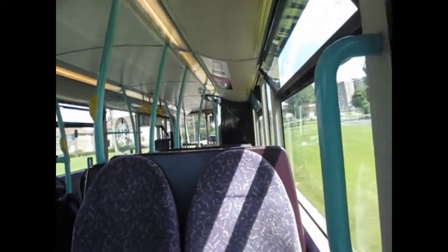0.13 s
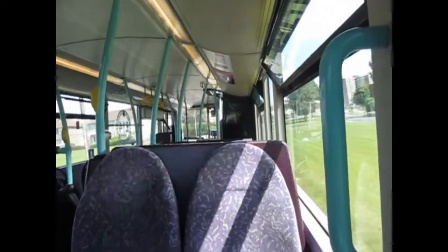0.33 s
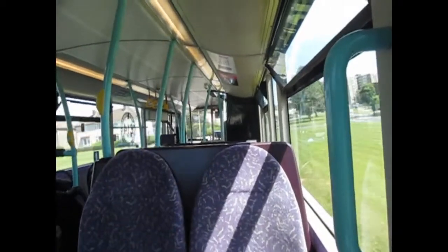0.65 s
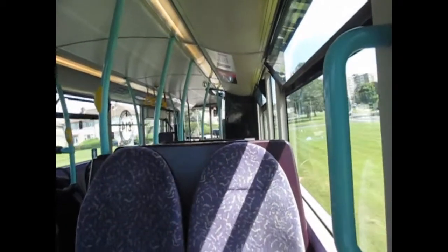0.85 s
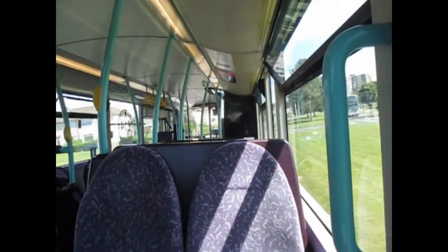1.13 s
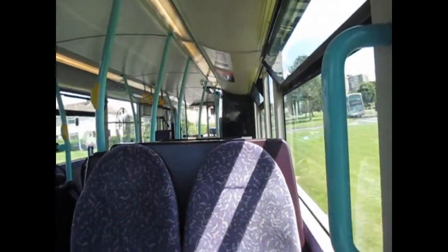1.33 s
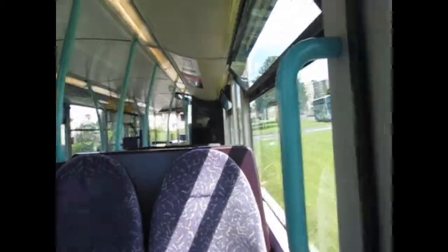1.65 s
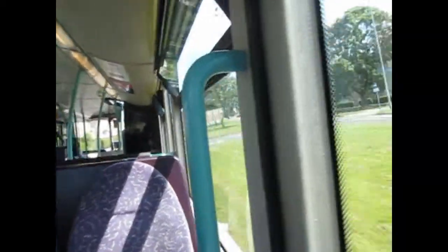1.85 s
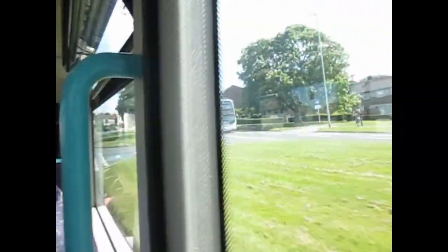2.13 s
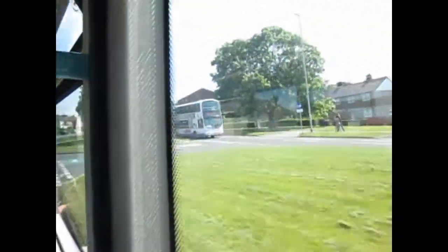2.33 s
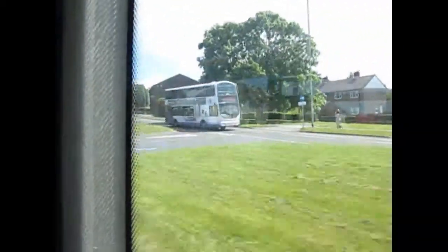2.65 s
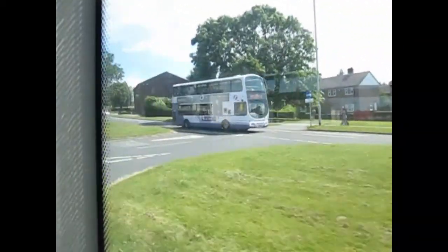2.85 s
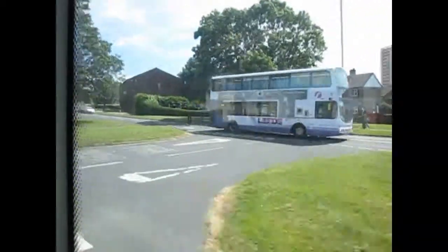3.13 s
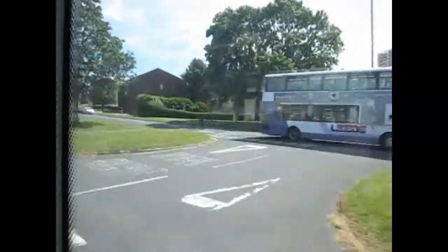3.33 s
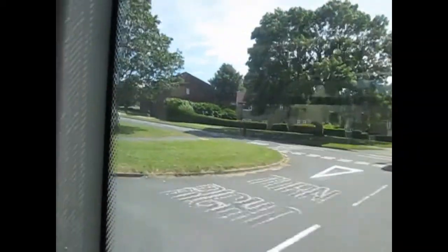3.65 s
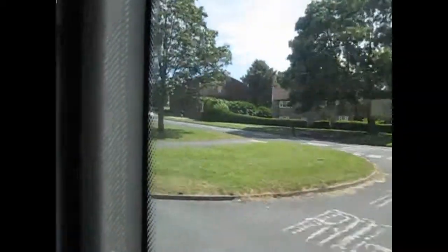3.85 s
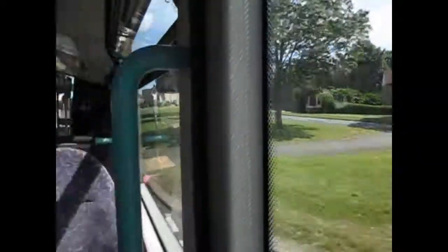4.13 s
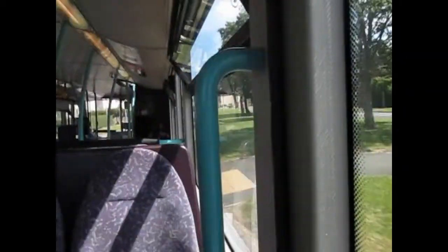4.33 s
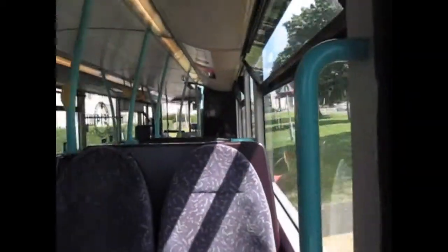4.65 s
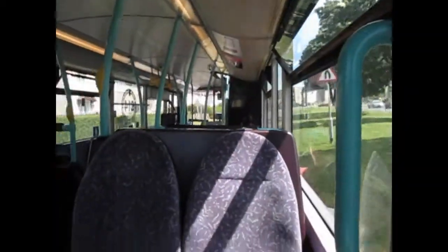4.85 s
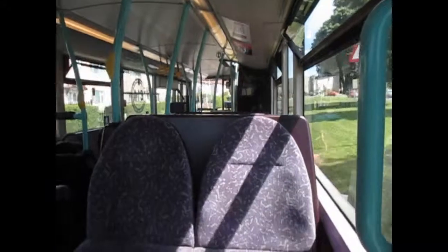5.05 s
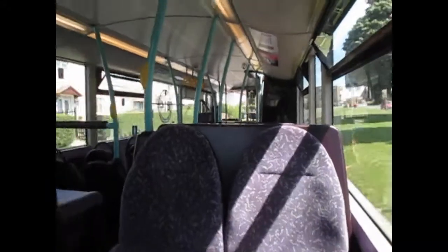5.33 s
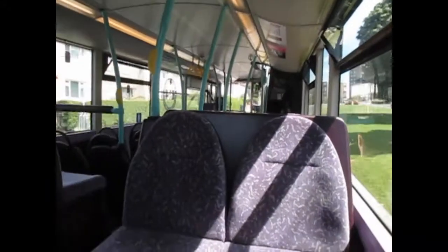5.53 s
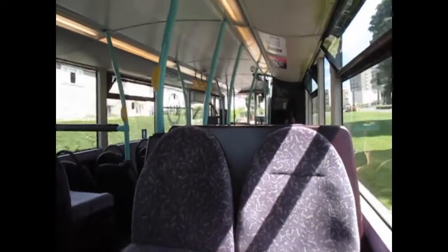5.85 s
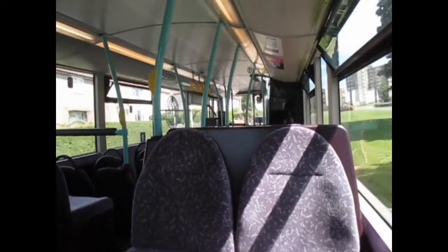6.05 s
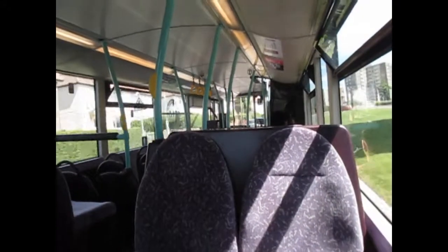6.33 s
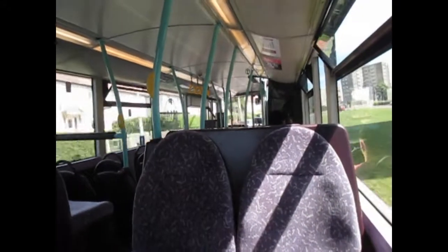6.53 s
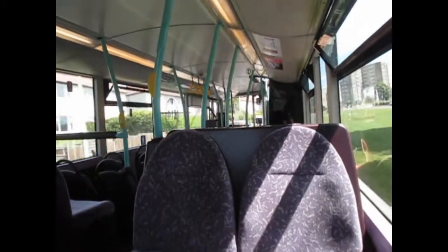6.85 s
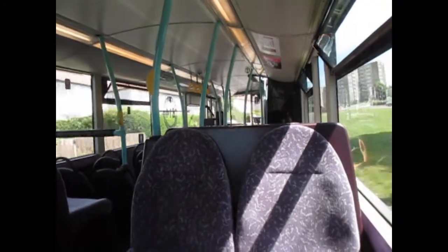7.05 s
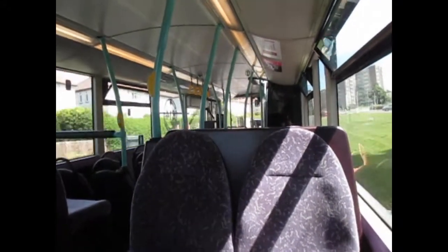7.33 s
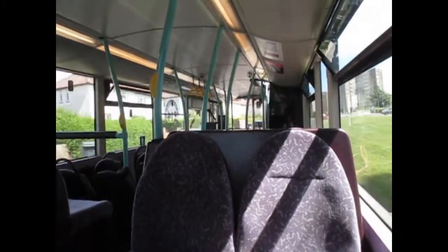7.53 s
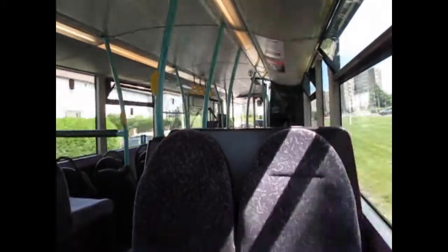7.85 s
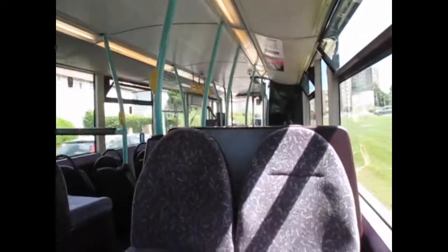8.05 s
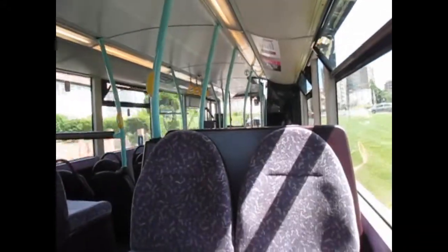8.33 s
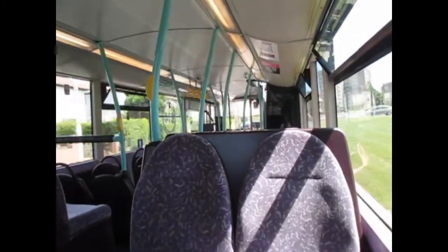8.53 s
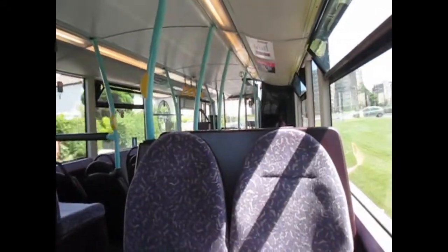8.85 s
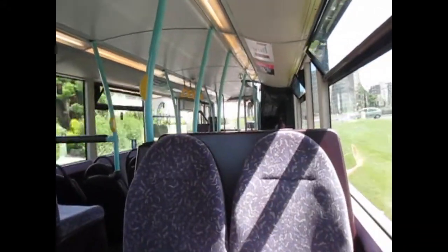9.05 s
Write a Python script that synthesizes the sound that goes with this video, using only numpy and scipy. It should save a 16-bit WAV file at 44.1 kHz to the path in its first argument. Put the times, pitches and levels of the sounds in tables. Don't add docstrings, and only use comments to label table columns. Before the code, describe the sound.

Throughout, a bus interior drones: a strong tonal fan-pump whine with rougher engine tones, deep road rumble, rushing air and dull hiss. Three short rubbery window-frame squeaks come in the first quarter second, another near 0.9. From 1.2 to 2.1 gusts slap the microphone in dull, irregular thumps, ducking everything briefly; the whine thins from about 1.3 to 1.9 and sinks slightly in pitch. From 2.2 to 4.0 squeaks repeat about eleven times a second in runs, loudest near 2.7, with more slaps around 3.1; the whine thins again from 3.5 to 4.2. Wind flutter swells around 4. From 4.2 to 6.1 a faint, bright air whistle rises and fades, while coarse creaks snap from 5.0 to 5.5 with glass ticks and tiny dropouts. Afterwards the drone is steadier, with isolated creaks until 7.8. Near 8.5 to 8.8 come last squeaks, a tick and a slap; the whine droops by 9.2.

```python
import sys
import numpy as np
from scipy import signal
from scipy.io import wavfile
from scipy.ndimage import uniform_filter1d

SR = 44100
rng = np.random.default_rng(int(sys.argv[2]) if len(sys.argv) > 2 else 0)


def inscribe(sig):
    pcm = np.round(np.clip(np.atleast_2d(sig).T, -1, 1) * 32767)
    wavfile.write(sys.argv[1], SR, pcm.astype(np.int16))


def makeup_ratio(level_db):
    decades = np.asarray(level_db, float) / 20
    return 10 ** decades


N = 405258

# start_s, pulse_rate_hz
PUMP_SPEED = [(0.0, 285.0), (0.4, 285.6), (0.8, 284.4), (1.25, 285), (1.82, 280.6), (2.1, 279.7),
              (2.9, 278.9), (3.43, 277.2), (4.22, 274), (4.8, 274.5), (5.2, 273.5), (5.6, 275.2),
              (6.0, 274.2), (7.5, 275.5), (7.9, 276.8), (8.8, 272.6), (9.0, 269.9), (9.19, 269.0)]
# start_s, end_s
UNLOADED = [
    (1.32, 1.92),
    (3.465, 4.2),
]
# start_s, share (0-1)
FACING = [
    (0, 0),
    (1.2, 0),
    (1.9, 0.7),
    (3.8, 1),
    (4.3, 0.51),
    (9.19, 0),
]
# level_db at cruise, faster_db_per_hz, slower_db_per_hz, facing_db
WHINE = [
    (-28.5, -.65, .4, -4),
    (-27.3, -.75, -.4, 2),
    (-51, 1.25, 0, -4),
]
SHAFT_SHARES = [
    .2012,
    .4024,
    .6036,
    .775,
    1.55,
    2.33,
    .278,
]
# level_db at cruise, faster_db_per_hz, slower_db_per_hz, facing_db
SHAFT_LEVELS = [(-29, -.2, -2.4, -1.5), (-35, .72, -1.1, -7), (-31, -.45, -.2, -2), (-39, .3, 2.1, -3),
                (-43, .4, .6, 0), (-46, 0, 0, 3), (-32, 0, 0, 0)]
# start_s, peak level_db, slip_rate_hz, length_s
SQUEAKS = [(.027, -10.5, 769, 0.033), (.126, -18.5, 763, 0.023), (.215, -16, 775, 0.023),
           (.925, -16, 810, .013), (2.205, -27, 760, .018), (2.295, -23, 765, .018),
           (2.392, -16.5, 777, 0.026), (2.476, -19.5, 770, 0.015), (2.586, -15, 756, .03),
           (2.68, -9, 770, 0.031), (2.766, -11, 756, .028), (2.854, -16, 751, 0.031),
           (2.942, -19.5, 722, 0.027), (3.028, -25, 725, 0.01), (3.122, -30, 775, 0.013),
           (3.307, -21, 778, 0.031), (3.399, -16.5, 770, 0.025), (3.476, -28, 755, .029),
           (3.562, -16.5, 777, .019), (3.655, -16.5, 770, 0.031), (3.75, -11, 963, 0.0077),
           (4.008, -13, 850, .011), (5.828, -18, 845, 0.017), (8.488, -18.5, 893, .014),
           (8.465, -13, 784, 0.011), (8.845, -22, 800, .011)]
# start_s, peak level_db, slip_rate_hz, length_s
CREAKS = [(5.039, -19.5, 413, 0.034), (5.1564, -11, 430, 0.015), (5.2654, -8.5, 450, 0.025),
          (5.3564, -5.5, 425, .016), (5.4494, -8.5, 464, 0.019), (5.5403, -19, 457, 0.02),
          (5.7364, -32.5, 463, 0.019), (5.9743, -20, 454, .022), (6.8044, -23, 437, 0.015),
          (7.5244, -20, 455, 0.021), (7.7652, -18.5, 465, 0.014)]
# pitch_hz, width_hz, level_db
FRAME_MODES = [(907, 67, -7.5), (1510, 80, -5), (1980, 260, 3), (2250, 55, 0), (2670, 100, -6),
               (3350, 200, -5), (3620, 170, -5), (4340, 200, -9), (5260, 130, -5)]
# start_s, peak level_db
GLASS_TICKS = [
    (1.4564, -30),
    (2.566, -25.5),
    (4.3794, -41),
    (5.0844, -30),
    (5.1774, -30),
    (5.3153, -25),
    (6.8224, -31),
    (7.0214, -35),
    (8.74, -29.5),
]
# start_s, heard level_db, length_s, top_hz
SLAPS = [(1.23, -4.5, .005, 2000), (1.243, -5.5, .03, 1700), (1.278, -14, .004, 1200),
         (1.349, -11, .01, 800), (1.408, -10, .012, 400), (1.47, -8, .048, 600), (1.52, -7, .008, 1600),
         (1.535, -7, .005, 2400), (1.54, -8, .004, 3200), (1.553, -13, .022, 900), (1.596, -18, .004, 900),
         (1.609, -9, .011, 1800), (1.63, -15, .008, 700), (1.75, -13, .05, 450), (1.867, -12, .012, 700),
         (2.035, -9, .025, 600), (2.06, -12, .008, 900), (3.062, -8, .018, 1000), (3.084, -8, .005, 1300),
         (3.155, -10, .032, 800), (3.505, -14, .012, 600), (4.28, -12, .01, 800), (8.765, -11, .02, 800)]
# start_s, duck_db
DUCKS = [(1.233, 7), (1.25, 11), (1.523, 5), (1.542, 12.5), (1.612, 11), (1.79, 3), (3.086, 5.5),
         (4.095, 3), (5.04, 2), (6.17, 3), (8.82, 3)]
# start_s, length_s
PINNED = [
    (5.062, 0.002),
    (5.082, 0.0017),
    (5.1, 0.0054),
    (5.137, 0.0029),
    (5.312, 0.0026),
    (5.445, 0.0025),
    (3.729, 0.0026),
]
# start_s, flutter level_db
WIND = [(0, -32), (.8, -35), (1.2, -25), (1.6, -21), (2.0, -27), (2.4, -26.5), (2.8, -30.5), (3.2, -25),
        (4.0, -18), (4.4, -29), (5.3, -53), (6.2, -40), (7.2, -34), (8.0, -28), (8.8, -49), (9.19, -28)]
# pitch_hz, level_db (per Hz)
FLUTTER = [(120, 0.5), (200, 3), (350, -4.5), (600, -6.5), (1000, -29)]
# pitch_hz, level_db (per Hz)
RUMBLE = [(12, -54), (20, 5.5), (43, 5.5), (129, 1.5), (156, 7.5), (221, -9), (243, -17), (267, -19.5),
          (300, -19.5), (330, -7), (430, -45.5), (730, -120)]
# pitch_hz, level_db (per Hz)
RUSH = [(140, -29.5), (230, -5.5), (275, -15), (317, -7), (492, -9.5), (549, -2.5), (604, -7), (873, -10.5),
        (1500, -30.5), (1950, -43), (3300, -120)]
# pitch_hz, level_db (per Hz)
HISS = [(800, -26), (1000, -0.5), (1400, 0), (2100, -4), (3000, -4.5), (4900, -7), (6500, -7.5),
        (9000, -13.5), (13000, -10.5)]
# pitch_hz, width_hz, level_db
CABIN_MODES = [(49.5, 1.9, -42), (76.5, 6, -35.5), (153.3, 12, -30), (226.3, 10, -34), (316.1, 7.1, -42.5),
               (361.8, 7.5, -38.5), (433.8, 6.9, -38), (602.5, 42, -50), (866.4, 37, -39.5)]

CRUISE_HZ = 274.5
RECOVER_DB_S = 45


def rms_one(x):
    return x / np.sqrt(np.mean(x ** 2) + 1e-20)


def in_time(rows):
    s, *columns = np.transpose(rows)
    return [np.interp(np.arange(N) / SR, s, column) for column in columns]


def drift(rate):
    r = np.exp(-80 * np.pi * rate / SR)
    coarse = rng.standard_normal(N // 40 + 2002)
    slow = signal.lfilter([1], [1, -2 * r, r * r], coarse)[2000:]
    return np.interp(np.arange(N) / 40, np.arange(len(slow)), rms_one(slow))


def resonate(x, hz, width):
    r = np.exp(-np.pi * width / SR)
    feedback = [1, -2 * r * np.cos(2 * np.pi * hz / SR), r * r]
    return signal.lfilter(np.array([1, 0, -1]) * (1 - r * r) / 2, feedback, x)


def pump_speed():
    hz, = in_time(PUMP_SPEED)
    return hz, np.maximum(hz - CRUISE_HZ, 0), np.maximum(CRUISE_HZ - hz, 0)


def unloading():
    idle = np.zeros(N)
    for start, end in UNLOADED:
        idle[round(start * SR):round(end * SR)] = 1
    return uniform_filter1d(idle, size=round(.13 * SR))


def tone_levels(rows):
    _, faster, slower = pump_speed()
    facing = np.clip(in_time(FACING)[0], 0, 1)
    return [db + up * faster + down * slower + turned * facing for db, up, down, turned in rows]


def tones(turns, shares, levels_db, waver_db, wobble):
    total = 0
    for share, db in zip(shares, levels_db):
        level = np.sqrt(2) * makeup_ratio(db + waver_db * drift(2.9))
        total = total + level * np.sin(share * turns + wobble * drift(5.7))
    return total


def drivetrain():
    turns = 2 * np.pi * np.cumsum(pump_speed()[0]) / SR
    idle = unloading()
    unload_loss_db = (2, 15, 0)
    whine_db = [db - loss_db * idle for db, loss_db in zip(tone_levels(WHINE), unload_loss_db)]
    whine = tones(turns, range(1, 4), whine_db, waver_db=1.5, wobble=.33)
    engine = tones(turns, SHAFT_SHARES, tone_levels(SHAFT_LEVELS), waver_db=2.0, wobble=.55)
    return makeup_ratio(.1) * whine + makeup_ratio(.8) * engine


def squeak_rows():
    rows = []
    for s, db, hz, length in SQUEAKS:
        strength = np.clip((db + 18) / 4, .15, 1)
        fullness = min(length / .028, 1) ** 2
        rows.append((s, db, hz, length, .55 * strength * fullness))
    return rows


def window_frame(events, jitter, gain_db):
    slips = np.full((len(FRAME_MODES), N), 1e-18)
    chance = rng.standard_normal((len(events), 64 + len(FRAME_MODES)))
    for (s, db, hz, length, speed_up), luck in zip(events, chance):
        count = min(int(hz * length), 60)
        part = np.arange(count) / count
        unevenness = 1 + jitter * (1 + 16 * speed_up * part ** 4) * luck[:count]
        gaps = unevenness / (hz * (1 + speed_up * part ** 5))
        at = np.round((s + np.cumsum(gaps) - gaps[0]) * SR).astype(int)
        grip = makeup_ratio(1.0 * luck[64:, None])
        swell = np.sin(np.pi * (part + .5 / count) ** 1.3)
        slips[:, at] += grip * makeup_ratio(db + gain_db) * swell
    shaken = 0
    for k, (hz, width, db) in enumerate(FRAME_MODES):
        shaken = shaken + (-1) ** k * makeup_ratio(db) * resonate(slips[k], hz, width) * 2000 / width
    far_wall = round(0.012 * SR)
    return shaken + makeup_ratio(-12.0) * np.pad(shaken, (far_wall, 0))[:N]


def bursts(events, low_hz, high_hz, rise_s, decay_s):
    shape = np.full(N, 1e-18)
    shape[[round(row[0] * SR) for row in events]] = makeup_ratio(np.array([row[1] for row in events]))
    shape = signal.lfilter([1], [1, -np.exp(-1 / (decay_s * SR))], shape)
    swell = np.exp(-1 / (rise_s * SR))
    shape = signal.lfilter([1 - swell], [1, -swell], shape)
    band = signal.butter(1, [low_hz, high_hz], "band", fs=SR, output="sos")
    return signal.sosfilt(band, shape * rng.standard_normal(N))


def window():
    creak_rows = [(*row, 0.047) for row in CREAKS]
    squeaks = window_frame(squeak_rows(), jitter=0.011, gain_db=-1.5)
    creaks = window_frame(creak_rows, jitter=.07, gain_db=-3.5)
    scrape = makeup_ratio(-0.5) * bursts(CREAKS, low_hz=900, high_hz=4020, rise_s=0.0068, decay_s=0.022)
    ticks = makeup_ratio(11) * bursts(GLASS_TICKS, low_hz=4500, high_hz=12000, rise_s=0.00092, decay_s=0.0057)
    return squeaks + creaks + scrape + ticks


def recover(duck_db):
    ramp = RECOVER_DB_S * np.arange(N) / SR
    return np.maximum.accumulate(duck_db + ramp) - ramp


def ducking():
    pushed = np.zeros(N)
    pushed[[round(s * SR) for s, db in DUCKS]] = [db for s, db in DUCKS]
    for s, db, _, length in CREAKS:
        pushed[round((s + length) * SR)] = max(0.72 * (db + 13.5), 0)
    return uniform_filter1d(recover(pushed), size=60)


def gusts():
    out = np.zeros(N)
    chance = rng.standard_normal((len(SLAPS), 4096))
    for (s, db, length, top_hz), luck in zip(SLAPS, chance):
        size = int(np.clip(length * SR, 40, 3000))
        eddies = resonate(luck, hz=250, width=450)
        dull = signal.sosfilt(signal.butter(4, max(top_hz, 250), fs=SR, output="sos"), eddies)
        lump = dull[-size:] * np.hanning(size) ** .6
        at = round(s * SR)
        out[at:at + size] += makeup_ratio(db) * lump / np.max(np.abs(lump))
    return out * makeup_ratio(ducking())


def whistle():
    start_s, end_s = 4.16, 6.1
    part = np.clip((np.arange(N) / SR - start_s) / (end_s - start_s), 0, 1)
    white = rng.standard_normal(N)
    edge = 0
    for hz, width, db in [(4800, 650, 0.1), (7170, 230, -4.5)]:
        ring = rms_one(resonate(resonate(white, hz, width), hz, width))
        edge = edge + makeup_ratio(db + 2.2 * drift(8)) * ring
    return makeup_ratio(-42.5) * np.sqrt(np.abs(np.sin(np.pi * part))) * edge


def banded_noise(spectrum, patchy_db, shared_db):
    hz_at, db_at = np.transpose(spectrum)
    thirds = np.arange(0, np.log2(hz_at[-1] / hz_at[0]) + .01, 1 / 3)[:36]
    edges = np.minimum(hz_at[0] * 2 ** thirds, .45 * SR)
    white = rng.standard_normal((2, N + SR))
    sway, out = drift(7), 0
    for k, (low, high) in enumerate(zip(edges, edges[1:])):
        band_pass = signal.butter(2, [low, high], "band", fs=SR, output="sos")
        band = signal.sosfilt(band_pass, white[k % 2])[SR:]
        level_db = np.interp(np.log(low * high) / 2, np.log(hz_at), db_at)
        out = out + makeup_ratio(level_db + shared_db * sway + patchy_db * drift(6.9)) * band
    return rms_one(out)


def road_and_wind():
    wind_db, = in_time(WIND)
    above_calm_db = wind_db + 35
    rumble_db = -20.5 - 0.1 * pump_speed()[2]
    roar = makeup_ratio(rumble_db) * banded_noise(RUMBLE, patchy_db=0.9, shared_db=0.6)
    roar += makeup_ratio(-26 + 0.073 * above_calm_db) * banded_noise(RUSH, patchy_db=-0.58, shared_db=1.16)
    roar += makeup_ratio(-31 + 0.016 * above_calm_db) * banded_noise(HISS, patchy_db=1.3, shared_db=0.93)
    return roar + makeup_ratio(wind_db) * banded_noise(FLUTTER, patchy_db=3.0, shared_db=4.0)


def cabin():
    white = rng.standard_normal(N + SR)
    held = 0
    for hz, width, db in CABIN_MODES:
        held = held + makeup_ratio(db) * rms_one(resonate(resonate(white, hz, width), hz, width)[SR:])
    return held


def scene():
    return (drivetrain() + window() + gusts() + whistle() + road_and_wind() + cabin())[None]


def top_cut(x):
    return signal.sosfilt(signal.butter(12, 15760, fs=SR, output="sos"), x)


def record(dry):
    free = np.ones(N)
    for s, length in PINNED:
        free[round(s * SR):round((s + length) * SR)] = 0
    slow = uniform_filter1d(dry, size=200)
    moved = slow + (dry - slow) * uniform_filter1d(free, size=30)
    led_in = np.pad(moved, [(0, 0), (999, 0)], "reflect")
    heard = signal.sosfilt(signal.butter(5, 5580, fs=SR, output="sos"), led_in)
    heard = signal.sosfilt(signal.butter(1, 32, "high", fs=SR, output="sos"), heard)[:, 999:]
    calm = heard * makeup_ratio(-ducking())
    ceiling_db, squeeze = -8, .65
    over_db = np.maximum(20 * np.log10(np.abs(calm[0]) + 1e-9) - ceiling_db, 0)
    level = calm * makeup_ratio(-squeeze * uniform_filter1d(recover(over_db), size=60))
    circuit_hiss = makeup_ratio(-65) * rng.standard_normal(N)
    return top_cut(level + circuit_hiss)


dry = scene()
out = record(dry)
inscribe(out)
```